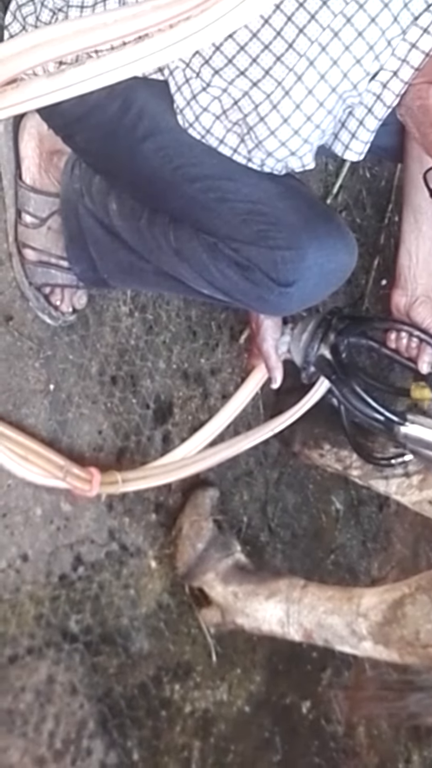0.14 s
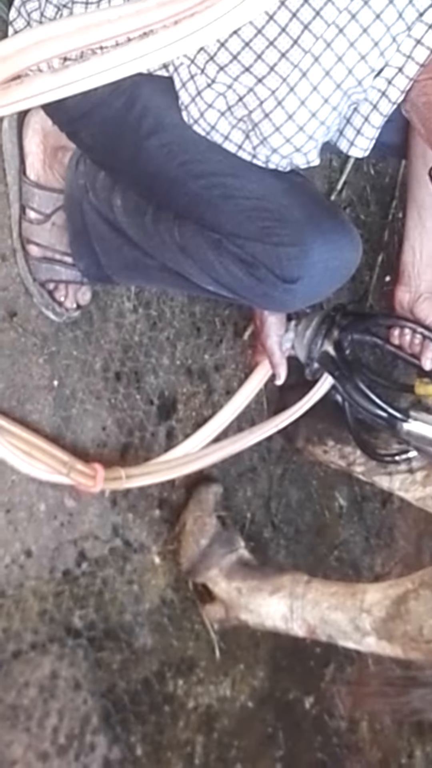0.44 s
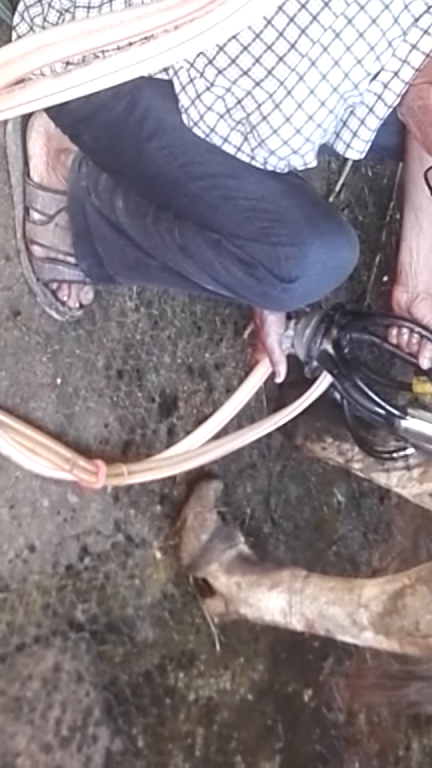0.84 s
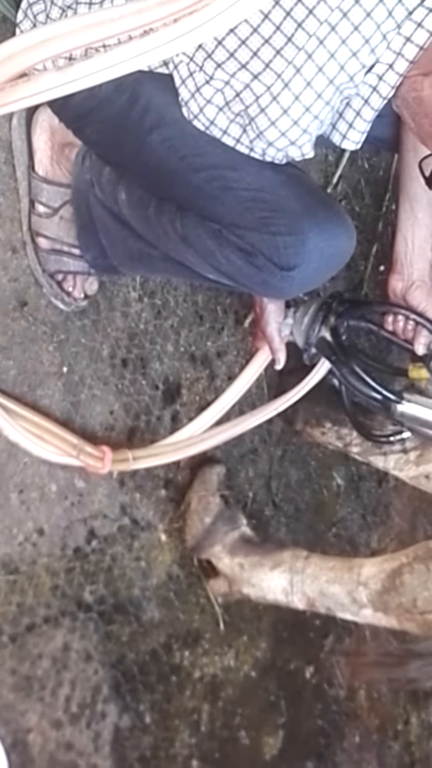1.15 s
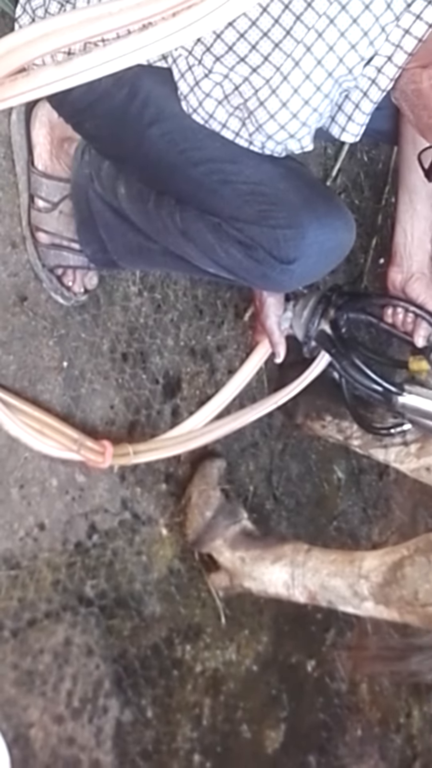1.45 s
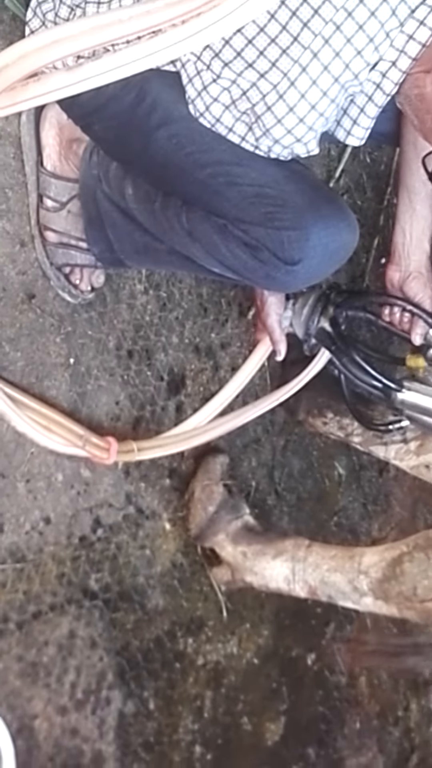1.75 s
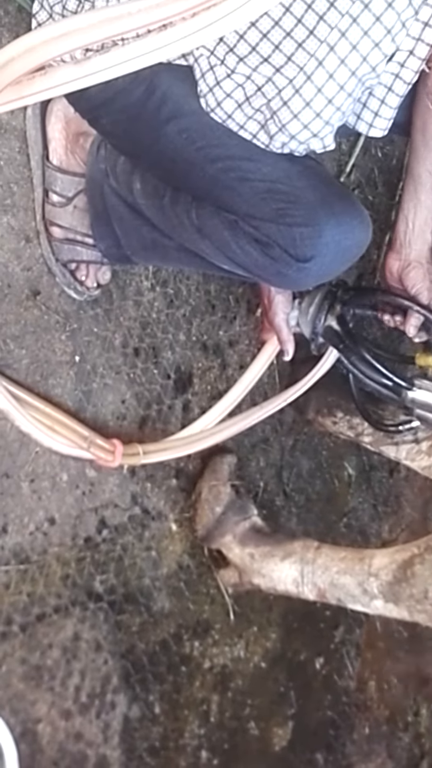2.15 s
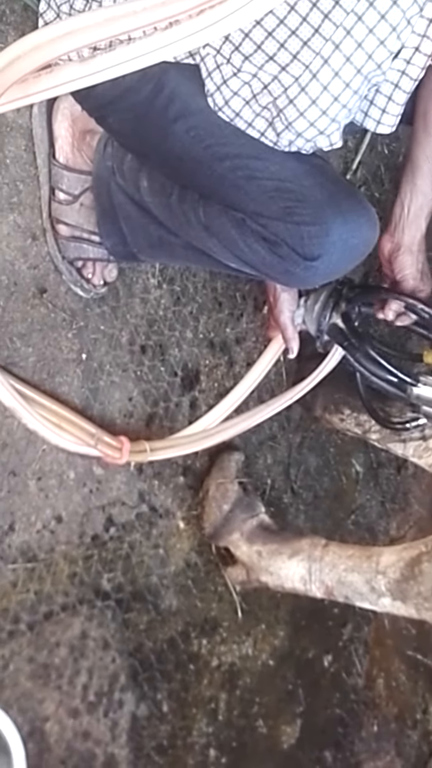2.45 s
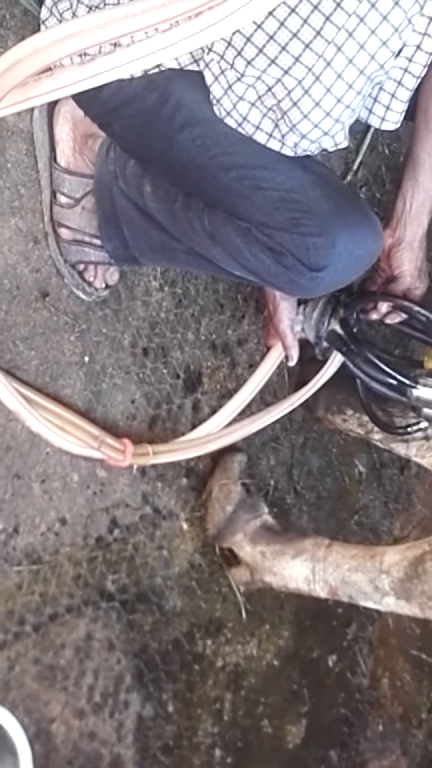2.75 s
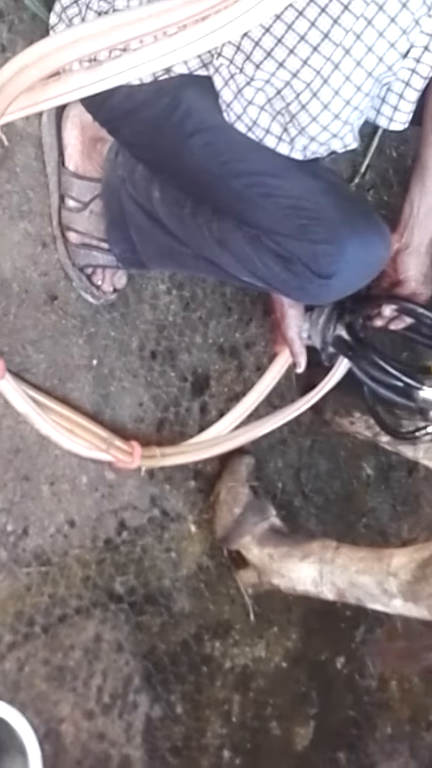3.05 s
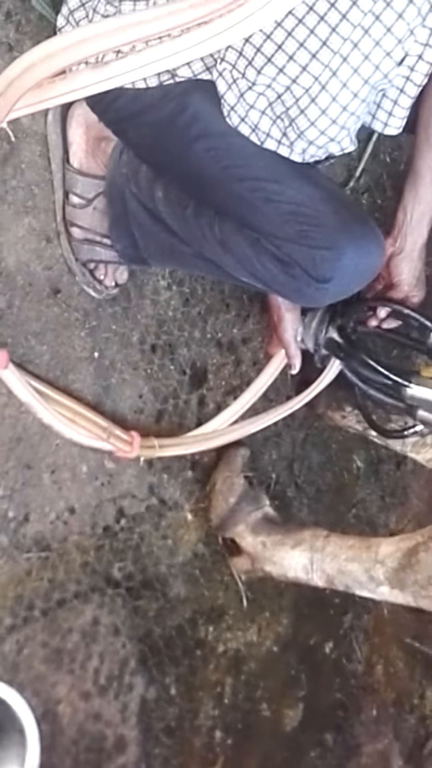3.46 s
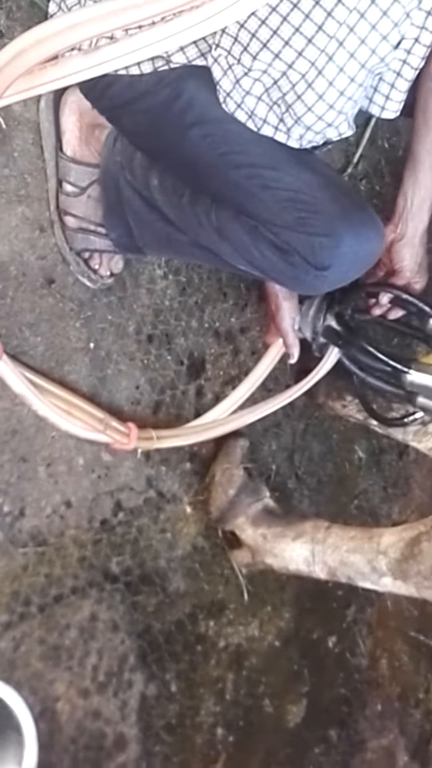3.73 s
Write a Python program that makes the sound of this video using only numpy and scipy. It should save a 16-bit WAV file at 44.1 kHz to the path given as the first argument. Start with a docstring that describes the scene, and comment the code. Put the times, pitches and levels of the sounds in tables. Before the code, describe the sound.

A milking machine's vacuum pump runs loudly throughout, close in a barn: a steady buzzing hum, rough metallic whirring and rushing air fluttering fast with the rotation. The pulsator clacks sharply at about 0.9, 1.9 and 2.9 seconds, each with an air puff, short echo, low knock and dull hose rattle; another faint rattle follows at 2.1. The hum weakens after 2.5 while a high whine grows slightly.

```python
"""Vacuum pump of a milking machine

A four-vane vacuum pump drones in a barn: harmonic orders of its shaft speed, each wavering slowly.
Rushing air, made of filtered noise that shares the casing's resonances, puffs with vanes and turns.
About once a second the pulsator valve clacks, as decaying modes and noise bursts, and its hose gives
a low knock, a decaying sine. Rattles of the hose cluster are decaying narrow-band noise."""
import sys
import numpy as np
from scipy import signal
from scipy.fft import rfft, irfft
from scipy.io import wavfile
from scipy.ndimage import uniform_filter1d, map_coordinates

SR = 44100
rng = np.random.default_rng(int(sys.argv[2]) if len(sys.argv) > 2 else 0)


def dump_mix(stems):
    """Bounce the given channels to the path in sys.argv[1] as a 16-bit WAV at rate SR."""
    frames = np.atleast_2d(stems).T  # one column per channel
    limited = np.clip(frames, -1, 1)  # hard clip at full scale
    pcm = np.round(limited * 32767).astype(np.int16)
    wavfile.write(sys.argv[1], SR, pcm)


N = 171549  # samples

NEAR_MONO_HZ = 800  # above this the pump's orders reach the two ports unrelated, save a few


def gain_of(db):
    """Level law: 20 dB is a factor of ten in amplitude."""
    return 10 ** (np.asarray(db) / 20)


def evened(x):
    """Normalization to unit root-mean-square amplitude."""
    return x / np.sqrt(np.mean(np.abs(x) ** 2) + 1e-20)


def read(points, hz):
    """Spectral curve: linear interpolation over logarithmic frequency."""
    f, value = np.transpose(points)
    return np.interp(np.log(hz + 1), np.log(f + 1), value)


def add(mix, s, sound):
    """Superposition: sum a sound into the mix from time s, cut at the end."""
    part = mix[:, round(s * SR):][:, :sound.shape[1]]
    part += sound[:, :part.shape[1]]


def narrow(shape, hz, width_hz):
    """Resonant filtering: noise through a resonance applied twice, of the given half-amplitude width."""
    f = np.fft.rfftfreq(shape[-1], 1 / SR)
    resonance = 1 / (1 + (2 * (f - hz) / width_hz) ** 2)
    return evened(irfft(rfft(rng.standard_normal(shape)) * resonance, shape[-1]))


SHAFT_HZ, SHAFT_WOBBLE_TURNS = 23.776, .003  # mean speed, rms wander


def shaft_turns():
    """Phase accumulation: turns of the shaft so far, with a very slight wander."""
    t = np.arange(N) / SR
    wander = sum(np.sin(2 * np.pi * (f * t + rng.random())) / f for f in np.geomspace(.15, 2, 8))
    return SHAFT_HZ * t + SHAFT_WOBBLE_TURNS * evened(wander)


VANES, TOP_ORDER = 4, 330
REST_SPREAD_DB, VANE_DB = 5, 2.5  # random spread of the other orders, lift of their vane multiples
PULSE_START, PULSE_SLIP = -2.2, -.1  # low vane orders start as one pulse (radians, radians per order)
WAVER_LOW, WAVER_HIGH, WAVER_FROM_HZ = .04, .5, 900  # rms share of amplitude, growing with frequency
WAVER_LOUD = .55  # the strongest orders waver by this share of the others' depth
HUM_HZ, HUM_WIDTH_HZ = 304, 83
WHINE_HZ, WHINE_WIDTH_HZ, WHINE_RISE_DB = 2640, 120, 2.5  # this whine grows over the scene
# Strongest shaft orders: [order/multiple of shaft speed, left level/dB, right level/dB]
STRONG_ORDERS = [(4, -42, -42), (5, -58, -59), (6, -60, -60), (7, -49, -50), (8, -41, -42), (9, -51, -53),
                 (10, -51, -51), (11, -51, -49), (12, -32, -33), (13, -57, -73), (15, -58, -56),
                 (16, -37, -35), (17, -62, -61), (18, -56, -53), (19, -60, -53), (20, -46, -46),
                 (24, -47, -47), (27, -65, -60), (28, -46, -55), (29, -64, -56), (30, -59, -66),
                 (32, -53, -44), (33, -60, -69), (34, -61, -60), (40, -60, -62), (41, -63, -78),
                 (44, -58, -56), (45, -73, -62), (48, -57, -55), (50, -58, -57), (52, -53, -51),
                 (55, -59, -54), (56, -59, -53), (59, -53, -48), (60, -56, -54), (64, -52, -47),
                 (65, -74, -54), (67, -48, -56), (68, -50, -65), (72, -58, -48), (80, -52, -47),
                 (84, -50, -44), (85, -49, -54), (88, -40, -43), (95, -56, -42), (96, -53, -43),
                 (99, -57, -48), (100, -51, -59), (104, -65, -48), (107, -52, -44), (108, -51, -43),
                 (111, -45, -44), (112, -44, -35), (113, -54, -42), (115, -48, -53), (116, -50, -52),
                 (120, -48, -56), (124, -58, -46), (132, -50, -44), (135, -59, -48), (139, -52, -52),
                 (140, -49, -44), (141, -62, -51), (148, -60, -51), (168, -54, -50), (178, -73, -50),
                 (179, -56, -67), (180, -56, -49), (184, -52, -46), (185, -58, -50), (188, -51, -50),
                 (190, -58, -46), (192, -55, -51), (196, -53, -60), (197, -55, -54), (200, -55, -58),
                 (201, -59, -54), (208, -57, -54), (209, -65, -54), (219, -59, -53), (224, -56, -51),
                 (225, -74, -54), (226, -55, -56), (229, -55, -59), (232, -55, -73), (317, -53, -52)]
# How far the other orders stand against the casing curve: [f/Hz, level/dB]
OTHER_ORDERS = [(30, -73), (500, -63.5), (1200, -50.5), (2500, -53), (3600, -48.5), (5000, -54.5),
                (6000, -57.5), (8000, -50)]
# Phase lag of the left port behind the right: [f/Hz, lag/rad]
PORT_PHASE_LAG = [(100, .1), (190, .65), (380, 1.1), (480, 1.6), (570, 2.75), (680, 2.6), (780, 3.8)]
# High orders that reach the two ports in phase: [order]
IN_STEP_ORDERS = [88, 112, 120, 184]
# High orders that reach the two ports nearly opposed: [order]
OPPOSED_ORDERS = [52, 59, 64, 80, 84, 95, 108]
# Level course of the hum around the twelfth order: [t/s, level/dB]
HUM_COURSE = [(0, 0), (.5, 0.5), (2.2, 1.2), (2.6, -1.5), (3.2, -3.5), (3.89, -4.5)]


def pump(turns):
    """Fourier synthesis: a sum of shaft orders fills one turn, read at shaft speed as each order wavers."""
    size, count = 16384, 24  # points in a turn, turn shapes spread over the scene
    k = np.arange(TOP_ORDER + 1)
    hz = k * SHAFT_HZ
    near_mono = hz < NEAR_MONO_HZ
    is_vane = k % VANES == 0

    db = read(CASING_CURVE, hz) + read(OTHER_ORDERS, hz) + VANE_DB * is_vane
    db = db + read(PORT_BALANCE, hz) * np.array([[.5], [-.5]])
    db = db + REST_SPREAD_DB * rng.standard_normal(db.shape)
    strong = np.array(STRONG_ORDERS)
    listed = np.round(strong[:, 0]).astype(int)
    db[:, listed] = strong[:, 1:].T

    phase = 2 * np.pi * rng.random(db.shape)
    phase[1] = np.where(is_vane & (k <= VANES ** 2), PULSE_START + PULSE_SLIP * k, phase[1])
    phase[0] = np.where(near_mono, phase[1] - read(PORT_PHASE_LAG, hz), phase[0])
    phase[0, IN_STEP_ORDERS] = phase[1, IN_STEP_ORDERS]
    phase[0, OPPOSED_ORDERS] = phase[1, OPPOSED_ORDERS] + np.pi * .8

    depth = WAVER_LOW + WAVER_HIGH * hz / (hz + WAVER_FROM_HZ)
    depth = depth * np.where(np.isin(k, listed), WAVER_LOUD, 1)
    shape = (2, count, len(k))
    drift = rng.standard_normal(shape) + 1j * rng.standard_normal(shape)
    drift = np.where(near_mono, drift[:1], drift) * depth / np.sqrt(2)

    hum_db = np.interp(np.linspace(0, N / SR, count), *np.transpose(HUM_COURSE))[:, None]
    whine_db = WHINE_RISE_DB * np.linspace(-.5, .5, count)[:, None]
    fade_db = hum_db * np.exp(-((hz - HUM_HZ) / HUM_WIDTH_HZ) ** 2)
    fade_db += whine_db * np.exp(-((hz - WHINE_HZ) / WHINE_WIDTH_HZ) ** 2)

    steady = gain_of(db) * np.exp(1j * phase) * (k > 0)
    lines = steady[:, None] * (1 + drift) * gain_of(fade_db)
    tables = irfft(lines, size) * size / np.sqrt(2)  # order levels become rms levels
    tables = np.concatenate([tables, tables[..., :1]], axis=-1)  # close the turn
    where = [np.linspace(0, count - 1, N), turns % 1 * size]
    return np.array([map_coordinates(table, where, order=1) for table in tables])


RING_DB, RING_RISE_S = -9, .0006
PUFF_DB, PUFF_T60_S, TAIL_DB, TAIL_T60_S = -15, 0.24, -18.5, 0.49
TICK_DB, TICK_T60_S = -15, .035
KNOCK_HZ, KNOCK_DB, KNOCK_RISE_S, KNOCK_T60_S = 322, -19.5, .03, .32
# Valve clacks, balance leaving the knock centred: [t/s, level/dB, left minus right/dB]
VALVE_CLACKS = [(0.9215, -8, -1.5), (1.943, -8.5, -1.5), (2.9479, -7.5, -2.0)]
# Relative spectral density of the puff and the barn's answer: [f/Hz, level/dB per Hz]
CLACK_CURVE = [(290, -41), (500, -27.5), (1550, -10.5), (1880, -5), (2250, -2), (3150, -5), (3780, -3),
               (4530, -13.5), (5350, -12.5), (8840, -15), (11000, -21.5), (14000, -18.5)]
# Housing modes, each sharpened by a random 0 to 3 %: [f/Hz, level/dB, t60/s]
HOUSING_MODES = [(1976, -1.5, 0.027), (2242, -11.5, .025), (3046, -1, 0.041), (3400, -1.5, 0.029),
                 (4036, -3, .022), (4440, -3, 0.029), (5400, -12, 0.018), (7260, -13, .015)]
# The valve slide settles, delays scaled at random by 0.75 to 1.15: [delay/s, level/dB]
SLIDE_BOUNCES = [(0, 0), (.0035, -6), (.009, -2), (.021, -7), (.036, -10)]


def clack(start, level_db, pan_db):
    """Impact excitation: the slide bounces and rings the housing; air puffs, barn answers, hose knocks."""
    t = np.arange(SR // 2) / SR
    hits = np.zeros((2, len(t)))
    for delay, db in SLIDE_BOUNCES:
        moment = delay * rng.uniform(0.75, 1.15) + 1e-4
        # later bounces take a random sign at each port
        sign = rng.choice([-1., 1.], (2, 1)) if delay else np.ones((2, 1))
        add(hits, moment, gain_of(db) * sign)

    ring = np.zeros(len(t))
    for k, (hz, db, t60) in enumerate(HOUSING_MODES):
        tone = np.sin(2 * np.pi * hz * rng.uniform(1.0, 1.03) * t)
        ring += gain_of(db - 60 * t / t60) * (-1) ** k * tone
    ring *= np.minimum(t / RING_RISE_S, 1)

    curve = gain_of(read(CLACK_CURVE, np.fft.rfftfreq(len(t), 1 / SR)))
    noise = evened(irfft(rfft(rng.standard_normal(hits.shape)) * curve, len(t)))
    puff_and_tail = gain_of(PUFF_DB - 60 * t / PUFF_T60_S) + gain_of(TAIL_DB - 60 * t / TAIL_T60_S)
    tick = evened(np.diff(rng.standard_normal((2, len(t) + 1))))  # differencing brightens the noise

    body = gain_of(RING_DB) * signal.fftconvolve(hits, ring[None], axes=1)[:, :len(t)]
    body += noise * puff_and_tail * np.minimum(t / .0005, 1)
    body += tick * gain_of(TICK_DB - 60 * t / TICK_T60_S)
    knock = np.sin(2 * np.pi * KNOCK_HZ * t) * gain_of(KNOCK_DB - 60 * t / KNOCK_T60_S)
    knock *= np.minimum(t / KNOCK_RISE_S, 1)
    return start, gain_of(level_db) * (body * gain_of([[pan_db / 2], [-pan_db / 2]]) + knock)


RATTLE_T60_S = 0.43
# Low resonances of the rattle: [f/Hz, width/Hz, level/dB]
RATTLE_RESONANCES = [(755, 97, 1.5), (960, 270, -2), (1230, 230, 0)]
# The hose cluster jolts: [t/s, level/dB]
HOSE_JOLTS = [(.922, -45), (1.943, -37), (2.09, -41), (2.949, -43)]


def rattle(start, db):
    """Damped resonance: a dull shake as decaying noise in a few low resonances."""
    t = np.arange(SR // 2) / SR
    shake = sum(gain_of(band_db) * narrow((2, len(t)), hz, width)
                for hz, width, band_db in RATTLE_RESONANCES)
    return start, shake * gain_of(db - 60 * t / RATTLE_T60_S) * np.minimum(t / 0.011, 1)


AIR_DB, TREBLE_HZ = -27, 5830  # level of the rush before puffing, start of the treble
PATCHY_DB, FLICKER_DB = 2, 0.93  # rms of drifting patches, rms of quick broad flicker
VANE_PUFF, TURN_PUFF = 0.057, 0.049  # modulation depth per vane and per turn
RIPPLE_DB, RIPPLE_HZ = 1.3, 45  # many small casing resonances: rms, smoothing width
# Relative spectral density shaped by the casing: [f/Hz, level/dB per Hz]
CASING_CURVE = [(32, -8), (37, -14), (83, -6.5), (134, -15), (180, -13.5), (226, -15.5), (296, -10),
                (390, -14.5), (419, -16.5), (699, -15), (869, -6.5), (985, -17), (1415, -9.5), (1841, -7.5),
                (1940, -3), (2199, -10), (2672, -0.5), (2866, -6), (3100, -4.5), (3200, -8), (3577, -9.5),
                (5359, -6), (6454, -12.5), (7528, -8.5), (8330, -12.5), (8976, -11.5), (9138, -8.5),
                (9329, -7), (9547, -10.5), (10422, -9), (10545, -12), (14136, -12)]
# Level course, of which only departures from the mean count: [t/s, middle level/dB, treble level/dB]
AIR_COURSE = [(0.0, -28.5, -35.5), (1.2, -29.5, -35), (1.77, -30, -35.5), (2.1, -29, -35),
              (3.52, -29.5, -36.5), (3.62, -29.5, -37), (3.89, -29, -37.5)]
# Left-right likeness of the rush: [f/Hz, correlation/1]
PORT_LIKENESS = [(30, .998), (80, .996), (130, .92), (290, .6), (620, -.34), (1360, -.3), (2980, .2),
                 (6500, .1), (14200, .05)]
# Balance between the ports, for rush and pump orders: [f/Hz, left minus right/dB]
PORT_BALANCE = [(32, 4), (300, -19), (900, 0.5), (2400, -4), (3900, -1), (6100, -1), (7400, -1), (9200, -3),
                (14300, -.5)]
# Fuzzy tones in the air: [f/Hz, width/Hz, level/dB]
AIR_MOANS = [(37.8, 5.5, -62.5), (65.5, 3, -53.5), (865, 14, -58.5), (2070, 53, -47.5), (2686, 100, -44.5),
             (4340, 160, -47.5), (5355, 220, -46.5), (9320, 50, -49)]


def air(turns):
    """Filtered turbulence: noise through casing resonances in drifting patches, puffing with the vanes."""
    frames, hz = N // 256 + 5, np.fft.rfftfreq(1024, 1 / SR)
    a, b, c, d, patches = rng.standard_normal((frames, 513, 5)).T
    patches = evened(uniform_filter1d(uniform_filter1d(patches, 10, 0), 12, 1))
    flicker = evened(uniform_filter1d(rng.standard_normal((frames, 513)), 120, 1)).T
    s, *bands = np.transpose(AIR_COURSE)
    frame_s = np.arange(frames) * 256 / SR
    middle, treble = (np.interp(frame_s, s, db - db.mean()) for db in bands)
    level_db = np.where(hz[:, None] < TREBLE_HZ, middle * (hz[:, None] > NEAR_MONO_HZ), treble)
    level_db = level_db + PATCHY_DB * patches + FLICKER_DB * flicker
    z = np.array([a + 1j * b, c + 1j * d]) * gain_of(level_db)
    white = rfft(signal.istft(z, nperseg=1024, noverlap=768)[1][:, :N])

    f = np.fft.rfftfreq(N, 1 / SR)
    same = np.clip(read(PORT_LIKENESS, f), -1, 1)
    pair = np.array([white[0], same * white[0] + np.sqrt(1 - same ** 2) * white[1]])

    span = round(RIPPLE_HZ * N / SR)
    ripple = uniform_filter1d(rng.standard_normal((2, len(f))), span)
    ripple = evened(uniform_filter1d(ripple, span)) * (f > NEAR_MONO_HZ)
    balance = read(PORT_BALANCE, f) * np.array([[.5], [-.5]])
    curve = gain_of(RIPPLE_DB * ripple + read(CASING_CURVE, f) + balance)
    low_cut = f ** 4 / (f ** 4 + 27.0 ** 4)  # halves the amplitude at 27 Hz
    rush = evened(irfft(pair * curve * low_cut, N))

    puff = 1 + VANE_PUFF * np.cos(2 * np.pi * VANES * turns) + TURN_PUFF * np.cos(2 * np.pi * turns)
    moans = sum(gain_of(db) * narrow((1, N), hz, width) for hz, width, db in AIR_MOANS)
    return gain_of(AIR_DB) * puff * rush + moans


def scene():
    """Superposition of all sources; one shaft drives both the pump's orders and the puffs of air."""
    turns = shaft_turns()
    mix = pump(turns) + air(turns)
    for row in VALVE_CLACKS:
        add(mix, *clack(*row))
    for row in HOSE_JOLTS:
        add(mix, *rattle(*row))
    return mix


EDGE_HZ = 14330


def record(dry):
    """Band limitation: a steep linear-phase low-pass filter removes the highest treble."""
    low_pass = signal.firwin(1535, EDGE_HZ, window=("kaiser", 13), fs=SR)
    return signal.oaconvolve(dry, low_pass[None], "same")


dry = scene()
out = record(dry)
dump_mix(out)
```